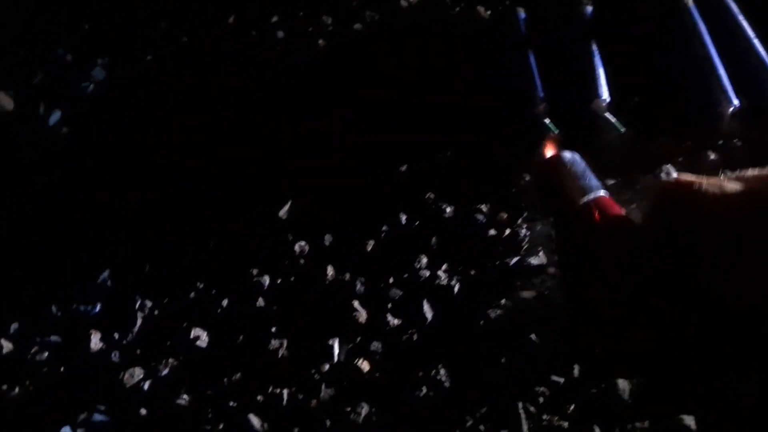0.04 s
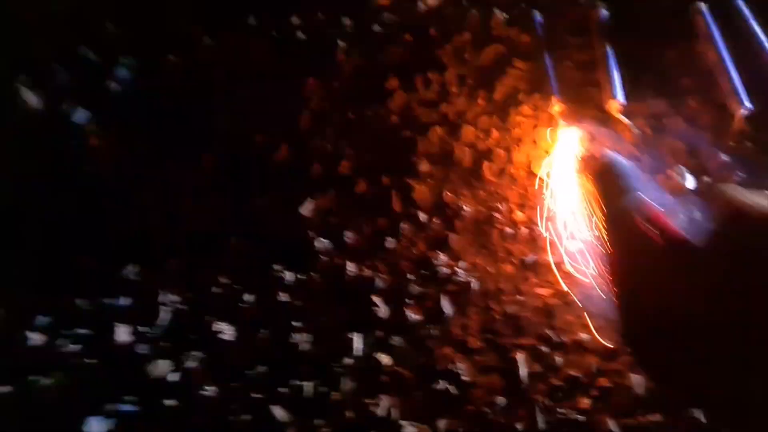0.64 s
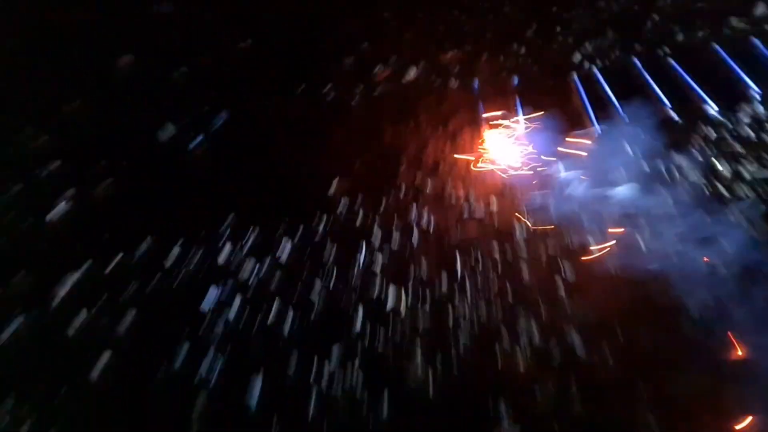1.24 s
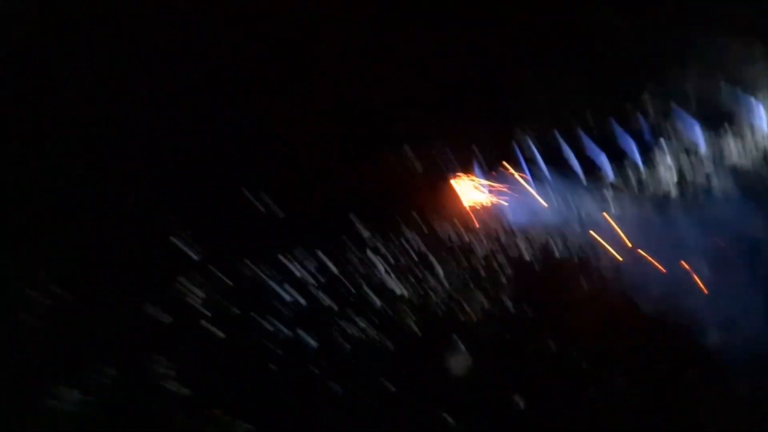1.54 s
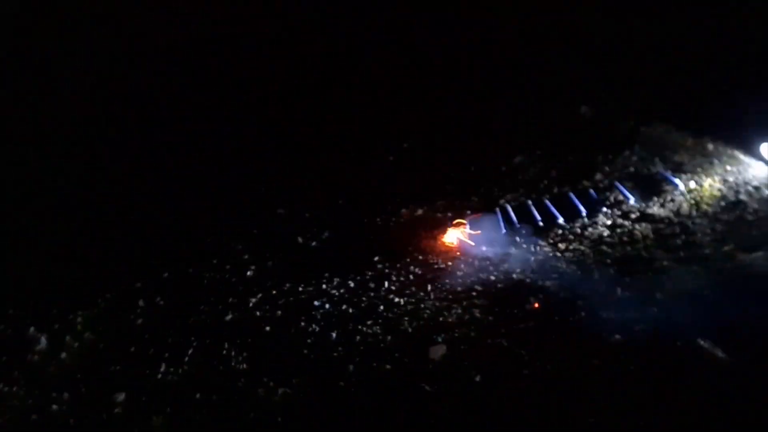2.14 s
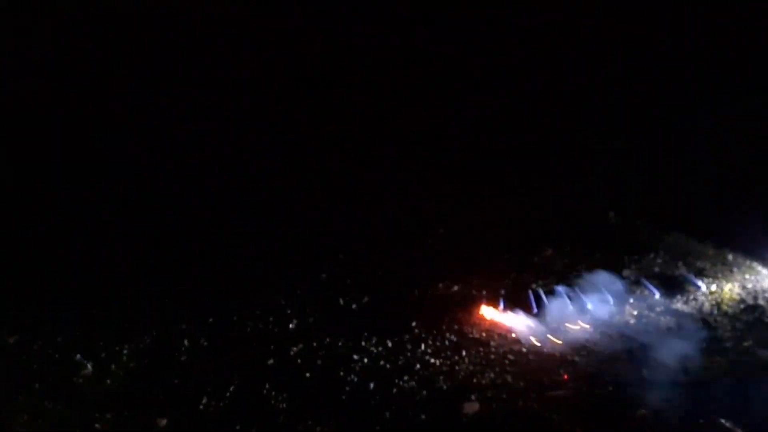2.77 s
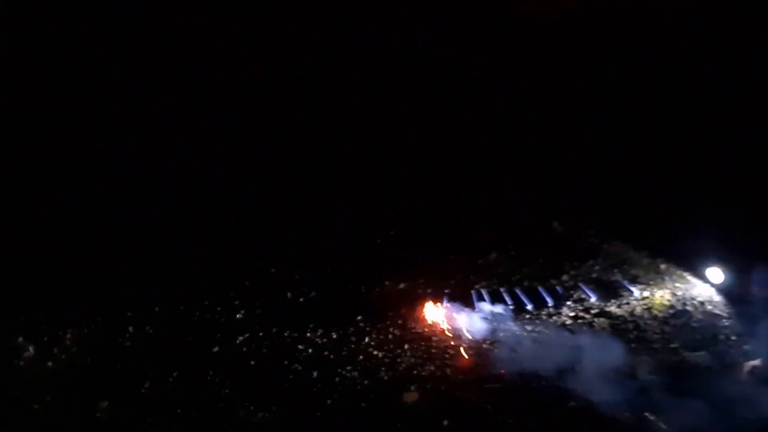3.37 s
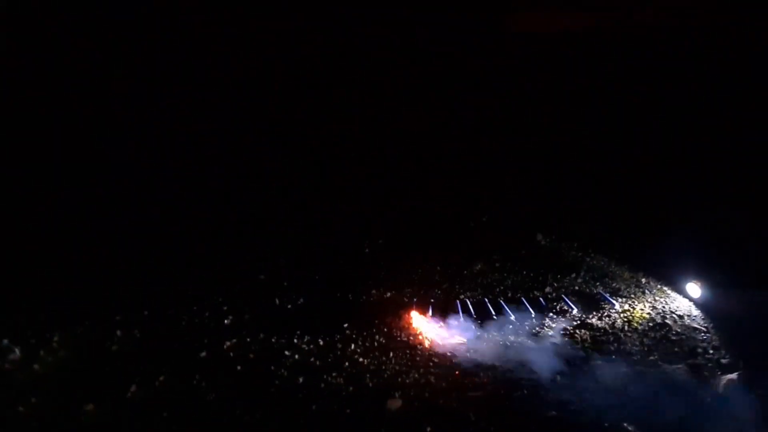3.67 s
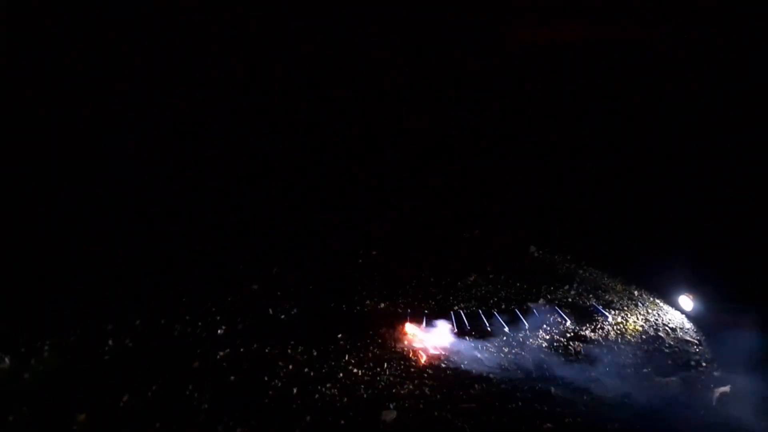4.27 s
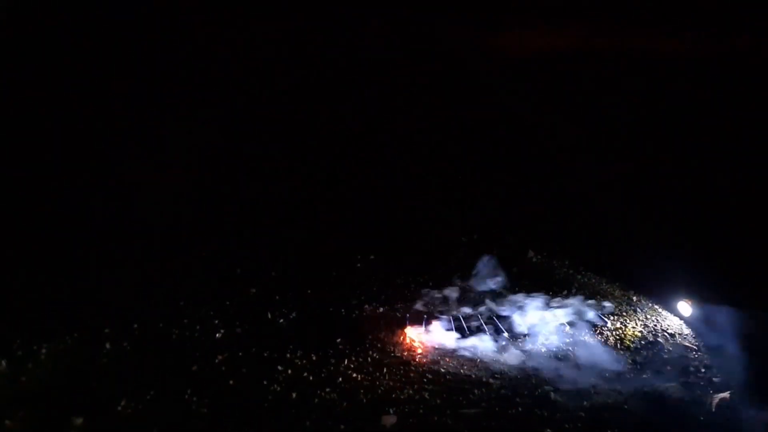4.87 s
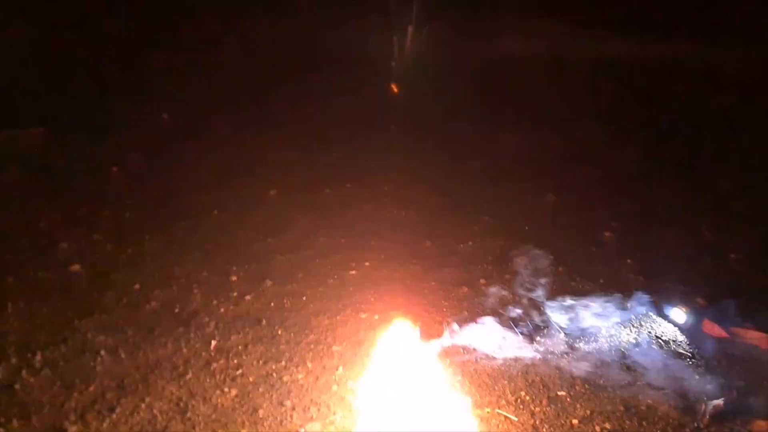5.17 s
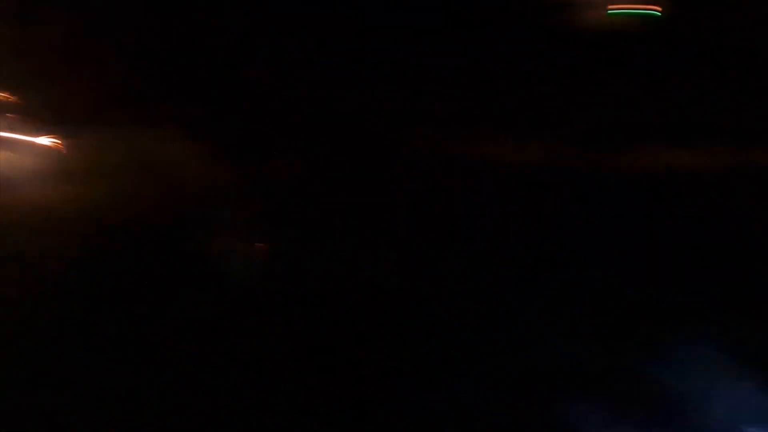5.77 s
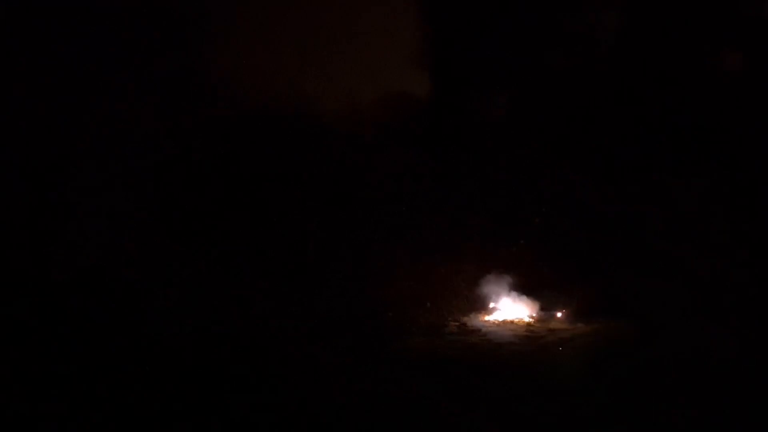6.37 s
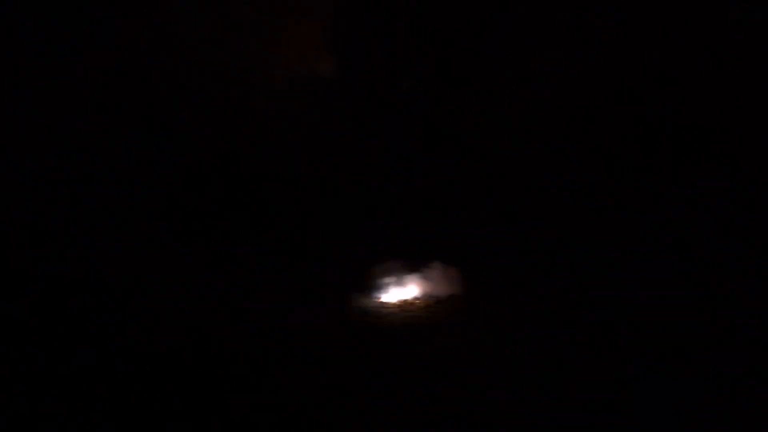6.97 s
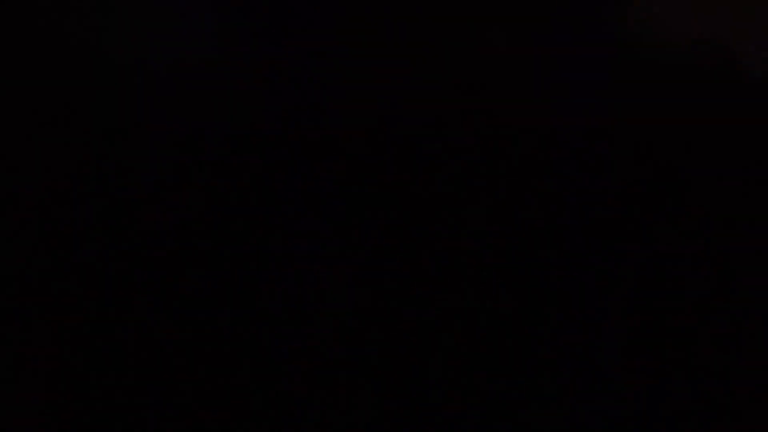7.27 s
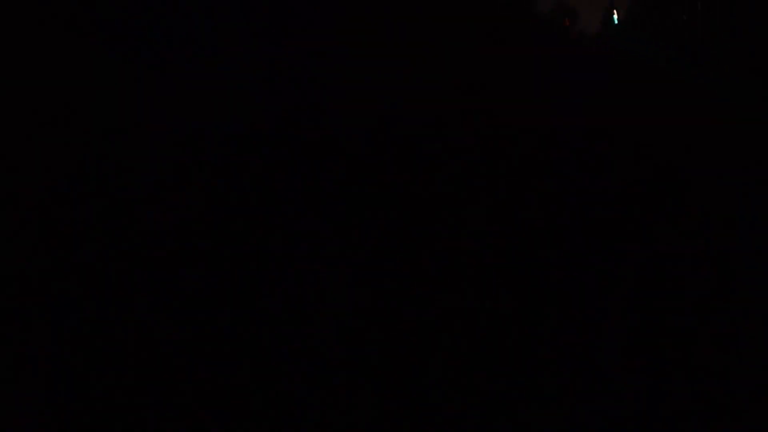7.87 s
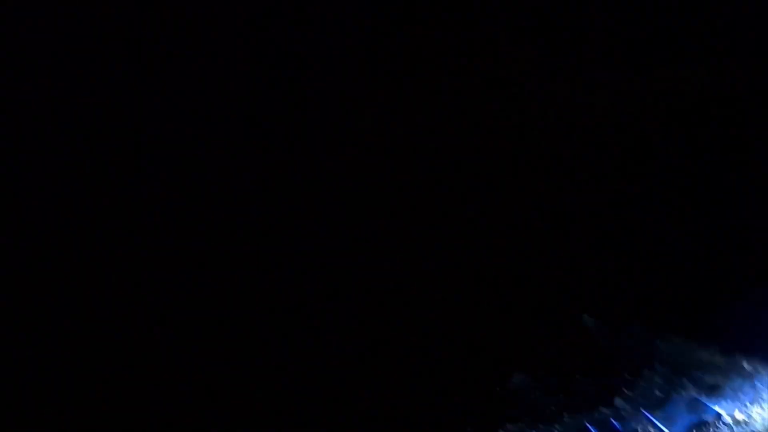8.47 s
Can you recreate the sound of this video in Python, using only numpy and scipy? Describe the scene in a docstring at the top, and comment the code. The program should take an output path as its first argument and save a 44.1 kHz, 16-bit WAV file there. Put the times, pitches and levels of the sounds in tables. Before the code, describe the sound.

A firework fuse hisses and spits, then a loud, shrill whistle falls in pitch, breaks into raspy shrieks and stops, outdoors at night.

```python
"""Howler firework at night

On a gravel path a fuse catches, hisses and spits among a few knocks of feet and hands. The charge
lights and burns in pulses: the tube screams, falls in pitch as it burns hollow and skitters off.
It coughs twice, shrieks, rasps and dies. The surroundings return a short echo over a low, distant drone."""
import sys
import numpy as np
from scipy import signal
from scipy.fft import rfft, irfft, next_fast_len
from scipy.io import wavfile
from scipy.ndimage import uniform_filter1d, minimum_filter1d

SR = 44100
rng = np.random.default_rng(int(sys.argv[2]) if len(sys.argv) > 2 else 0)


def log_audio(samples):
    """Write samples as a 16-bit WAV file to the path given in sys.argv[1]."""
    # one column per channel
    frames = np.atleast_2d(samples).T
    # limit to full scale, then quantise
    limited = np.clip(frames, -1, 1)
    pcm = np.round(limited * 32767).astype(np.int16)
    wavfile.write(sys.argv[1], SR, pcm)


N = 385018
TIME = np.arange(N) / SR

# The long howl sinks as the tube burns hollow. Each row: time in seconds, pitch in Hz.
HOWL_PITCH = [(5.09, 4800), (5.106, 4960), (5.117, 4660), (5.165, 4570), (5.19, 4315), (5.258, 4285),
              (5.286, 4060), (5.41, 3860), (5.45, 3690), (5.5, 3665), (5.62, 3400), (5.71, 3330),
              (5.79, 3160), (5.9, 3325), (6.0, 3149), (6.128, 3155), (6.23, 3000), (6.29, 2975)]
# Its strength. Each row: time in seconds, then fundamental, octave and upper partials in dB.
HOWL_LEVELS = [(5.085, -28, -65, -48), (5.106, -4.5, -27, -23.5), (5.17, -9, -32.5, -28),
               (5.29, -7, -25.5, -18.5), (5.43, -6, -19.5, -23), (5.55, -16.5, -23, -32.5),
               (5.751, -19, -21.5, -37.5), (5.85, -30, -42.5, -49), (5.95, -28, -26, -33),
               (6.1, -21.5, -44, -50), (6.292, -18, -38.5, -45.5)]
# Shrieks after the coughs. Each row: start and length in seconds, first and target pitch in Hz,
# then first level, last level, octave and upper partials in dB.
SHRIEKS = [(6.307, .231, 2715, 2490, -16, -14.5, -36, -39), (6.559, .068, 2146, 2130, -9.5, -14, -34, -28),
           (6.632, .473, 2305, 2175, -20, -16.5, -38, -36), (7.113, .035, 2496, 2477, -30, -42, -66, -57)]
# The scream's bright edge. Each entry: trim in dB, for partials 3 to 7.
UPPER_TRIMS = [-3.5, -5, -7.5, -8.5, -13]
# The tube darts about. Each row: time in seconds, left over right in dB, left ear's lead in radians.
TUBE_DIRECTION = [(5.1, -2.5, 0.9), (5.28, -5, 0.74), (5.39, -8.5, 3.5), (5.45, 3.5, 4.5), (5.52, 2, 5),
                  (5.55, 4, 5), (5.76, 3.5, 5.5), (5.93, 1.5, 4), (6.07, -6.5, -0.5), (6.17, -5.5, -1.53),
                  (6.53, -6.5, -1.45), (6.65, -0.5, -1.4), (7.05, -3.5, 1)]
# In flight the ground reflection falls behind. Each row: time in seconds, extra path in metres.
FLIGHT = [(5.32, .004), (5.353, .0436), (5.393, .134), (5.525, .242), (5.61, .35), (5.78, .485)]
# Tone colours of the gas jet, body and top. Each row: frequency in Hz, relative level in dB.
JET_ROAR = [(80, -20), (900, -3), (1450, 1.5), (1750, 0.5), (2050, 8), (2350, -3.5), (2650, -11),
            (3200, -1), (4200, -21)]
JET_HISS = [(500, -38), (3000, -1.5), (4000, -15), (5500, -0.5), (7800, -3), (9200, -14), (10800, -2.5),
            (12200, 1), (14000, 0.5), (16000, -9.5)]
# Puffs of gas. Each row: start in seconds, peak in dB, centre in Hz, decay in seconds.
COUGHS = [(5.27, -25, 175, 0.045), (6.298, -23, 160, 0.0095), (6.547, -20, 248, 0.014)]
# How fiercely the fuse burns. Each row: time in seconds, level in dB.
FUSE_BURN = [(0, -76), (.4, -62), (.55, -45), (.66, -43), (.97, -41), (1.06, -49), (1.35, -46.5),
             (1.8, -48.5), (2.02, -56), (2.25, -46.5), (2.5, -54), (3.07, -48.5), (3.25, -52.5),
             (3.65, -50), (3.85, -55.5), (4.33, -48.5), (5.03, -53)]
# Tone colours of the fuse, low to high. Each row: frequency in Hz, relative level in dB.
FUSE_FLAME = [(60, -6), (150, 3), (500, 1.5), (1250, 1), (2200, -2), (4000, -8), (8000, -24.5)]
FUSE_HISS = [(1000, -17.5), (3000, -0.5), (5000, -4), (6200, 2), (7300, -6), (9000, -17.5), (12000, -25.5)]
FUSE_FIZZ = [(6000, -31.5), (9000, -41), (10500, -7.5), (12500, -0.5), (15000, 0), (16000, -1)]
# The tube's mouth rings around the flame. Each row: time in seconds, resonance in Hz, level in dB.
TUBE_MOUTH = [(2.3, 2550, -90), (2.7, 2930, -61), (3.05, 3296, -51.5), (3.45, 3610, -46.5),
              (3.9, 3780, -43.5), (4.15, 4128, -43.5), (5.05, 4120, -40.5)]
# Stereo image of fuse and jet. Each row: frequency in Hz, left-right correlation.
FIRE_IMAGE = [(200, 0.94), (4000, 0.7), (9000, .3)]
# Sharp snaps and dull knocks. Each row: start in seconds, peak in dB, centre in Hz, decay in seconds.
SNAPS = [(.622, -23.5, 2200, 0.0025), (1.509, -13.5, 2500, .0007), (1.884, -10.5, 4250, .0026),
         (1.915, -11, 3400, .003), (2.348, -23, 3500, .0011), (2.533, -30.5, 3800, .002),
         (2.641, -29, 3980, .002), (3.075, -28, 6060, .012), (4.34, -28.5, 5490, .03),
         (7.708, -40, 1800, .0015), (8.369, -37, 2010, .0016), (8.695, -40, 1800, .002)]
KNOCKS = [(1.172, -16.5, 290, 0.0027), (1.883, -20.5, 237, .008), (1.912, -26.5, 295, 0.0051),
          (2.177, -21, 197, 0.0048), (2.188, -20, 211, .006), (2.2, -28.5, 198, 0.022),
          (7.93, -41.5, 704, 0.0031), (8.38, -29, 340, 0.013), (8.658, -37, 883, 0.0046)]
# The outdoor tail. Each row: frequency in Hz, seconds to fall 60 dB.
TAIL_DECAY = [(200, .5), (2200, 0.71), (6500, 0.71), (15000, 0.18)]
# Fader rides for the night air and the drone. Each row: time in seconds, level in dB.
AIR_LEVEL = [(0, -47.5), (5.05, -49.5), (5.6, -54.5), (7.25, -58), (8.3, -53.5), (8.42, -50.5),
             (8.73, -51.5)]
DRONE_LEVEL = [(.4, -49), (.7, -41), (3.3, -48), (4.7, -41), (5.6, -47), (8.7, -48)]
# Their tone colours. Each row: frequency in Hz, relative level in dB.
AIR_COLOUR = [(100, 1), (200, -2), (400, -2.5), (700, -1), (1150, 1.5), (2000, 0), (2800, -7.5),
              (4000, -16), (6500, -12.5), (9000, -27), (12500, -20.5), (16000, -25.5)]
DRONE_COLOUR = [(15, -21), (48, -11.5), (59, 1.5), (68, 6), (74, -7), (82, -4), (100, -13.5), (145, -18.5),
                (180, -17), (270, -20), (900, -60)]
# Their stereo image. Each row: frequency in Hz, left-right correlation.
NIGHT_IMAGE = [(60, 0.88), (290, 0.82), (640, .1), (1400, -0.32), (3100, 0.024)]

ATTACK_S, RELEASE_S = 0.014, 0.015  # the tone catches and breaks off
FRESH_START_S, FRESH_LENGTH_S = 5.122, .38  # the fresh charge growls
RASP_START_S = 6.642  # the last of the charge burns raggedly


def scream(hz, tone_db, octave_db, upper_db, rasp_db):
    """The charge burns in pulses at the tube's pitch; uneven burning shakes their size and timing."""
    pan_db, lead = curves(TUBE_DIRECTION)
    ear_phase = lead * np.array([[.5], [-.5]])
    fresh_db = gate_db(FRESH_START_S, FRESH_LENGTH_S, ATTACK_S, release_s=FRESH_LENGTH_S)
    weakness = np.clip((-20 - tone_db) / 10.5, 0, 1)  # below -20 dB the tone turns rough
    rough = .067 + .35 * weakness + .22 * amp(rasp_db) + .039 * amp(fresh_db)
    jitter = .003 * wander(60) + .025 * rough * wander(260)
    phase = 2 * np.pi * np.cumsum(hz * (1 + jitter)) / SR

    def partial(order, db, flutter_db=3.0):
        """The tumbling tube makes a partial flutter differently in each ear."""
        flutter = flutter_db * np.array([wander(35), wander(35)])
        wave = np.cos(order * phase + ear_phase) * (order * hz < SR / 2)
        return np.sqrt(2) * amp(db + flutter) * ground_reflection(order * hz) * wave

    tone = partial(1, tone_db, flutter_db=1.05) + partial(2, octave_db, flutter_db=2.5)
    for order, trim_db in enumerate(UPPER_TRIMS, start=3):
        jet_colour_db = .6 * spectrum_at(JET_HISS, order * hz)
        tone += partial(order, upper_db + trim_db + jet_colour_db, flutter_db=3.2)
    # Strong and weak cycles alternate, adding a growl of half-order partials; the lowest fades first.
    growl_db = fresh_db - 12 - 30 * ((TIME - FRESH_START_S) / FRESH_LENGTH_S) ** 2
    tone += partial(1 / 2, tone_db + 3 * growl_db + 21)
    tone += partial(3 / 2, tone_db + growl_db - 3)
    tone += partial(5 / 2, tone_db + growl_db - 14)
    squeal_db = rasp_db - 26 - 29 * np.maximum(TIME - RASP_START_S, 0)  # rides on the rasp, fading
    tone += partial(7 / 2, squeal_db)
    shake = np.maximum(1 + .85 * rough * wander(280), 0) / np.sqrt(1 + rough ** 2 / 2)
    breath = resonate(rng.standard_normal((2, N)), hz, width_hz=300) * amp(tone_db - 28)
    return (tone * shake + breath) * panned(pan_db)


def charge_burn():
    """Pitch and levels of the burning charge: one long howl, then short shrieks that each sag."""
    hz, = curves(HOWL_PITCH)
    howl_start, howl_end = HOWL_LEVELS[0][0], HOWL_LEVELS[-1][0]
    levels_db = curves(HOWL_LEVELS) + gate_db(howl_start, howl_end - howl_start, ATTACK_S, RELEASE_S)
    for start, length, first_hz, target_hz, first_db, last_db, octave_db, upper_db in SHRIEKS:
        progress = np.clip((TIME - start) / length, 0, 1)
        sagging_hz = target_hz + (first_hz - target_hz) * np.exp(-progress / .33)
        hz = np.where(TIME > start - ATTACK_S / 2, sagging_hz, hz)
        tone_db = first_db + (last_db - first_db) * progress
        envelope_db = gate_db(start, length, ATTACK_S, RELEASE_S)
        levels_db = np.maximum(levels_db, [envelope_db + db for db in (tone_db, octave_db, upper_db)])
    return hz, *levels_db


def ground_reflection(hz):
    """Comb-filter gain in flight: the bounce off the ground cancels and supports a partial in turn."""
    strength = .63 * during(FLIGHT)
    delay_s = curves(FLIGHT)[0] / 343
    return abs(1 + strength * np.exp(2j * np.pi * hz * delay_s)) / (1 + strength)


def gas_jet(tone_db, upper_db, rasp_db):
    """Gas leaves in ragged spurts: a spit at ignition, a rush under the tone, a surge in the rasp."""
    spurts = amp(1.9 * wander(300))
    roar = noise(JET_ROAR, FIRE_IMAGE, band_hz=(300, 1800), drive=spurts)
    hiss = noise(JET_HISS, FIRE_IMAGE, band_hz=(5200, 15800), drive=spurts)
    roar_db = tone_db - 31.5 - 13 * during(FLIGHT, fade_s=.055)
    hiss_db = upper_db - 7.5 - 2 * during(FLIGHT, fade_s=.1)
    roar *= np.hypot(amp(roar_db), amp(rasp_db - 31.5))
    hiss *= np.hypot(amp(hiss_db), amp(rasp_db - 30.5))
    spit = resonate(rng.standard_normal((2, N)) * spurts, hz=np.full(N, 5300), width_hz=2300)
    spit *= amp(-24 + gate_db(start_s=5.075, hold_s=.04, attack_s=.068, release_s=.25))
    return roar * panned(-2) + (hiss + spit) * panned(-6.5)


def coughs():
    """The charge coughs out low puffs of gas, one during the howl and two after it."""
    return bursts(COUGHS, bandwidth=2.8, spread=.3, pan_db=-3.5)


def fuse():
    """Powder grains flare one after another; the flame sinks into the tube, muffled, and rings it."""
    burn_db, = curves(FUSE_BURN)
    inside = np.clip((TIME - 1.7) / 1.3, 0, 1)  # reaches the tube at 1.7 s, sinks in over 1.3 s
    sparks = (rng.random(N) < 160 / SR) * np.minimum(rng.exponential(1, N), 4)
    sputter = amp(wander(26) + 1.5 * wander(400)) * (1 + 2.7 * sparks)
    flame = noise(FUSE_FLAME, FIRE_IMAGE, drive=sputter) * amp(burn_db + 3 - 7.6 * inside)
    hiss = noise(FUSE_HISS, FIRE_IMAGE, drive=sputter)
    hiss *= amp(burn_db + 2.5 - 1.5 * inside + .8 * wander(17))
    flare_db = .22 * (burn_db + 48.5)  # a fiercer burn is brighter
    fizz = noise(FUSE_FIZZ, FIRE_IMAGE, drive=sputter)
    fizz *= amp(burn_db + flare_db - 3 + 1.6 * inside + 1.7 * wander(7))
    fire = flame * panned(-1.2) + hiss * panned(-5) + fizz * panned(-6.5)
    return (fire + tube_mouth(sputter) * panned(-9)) * during(FUSE_BURN, fade_s=.13)


def tube_mouth(sputter):
    """The fuse's gas sounds two odd modes of the mouth; the upper one needs a stronger flow."""
    hz, level_db = curves(TUBE_MOUTH)
    flow = (rng.standard_normal(N) + .37 * rng.standard_normal((2, N))) * sputter
    lower = resonate(flow, hz, width_hz=700)
    upper = resonate(flow, 2.9 * hz, width_hz=1500) * amp(-8 + (level_db - level_db.max()) / 3)
    return (lower + upper) * amp(level_db)


def snaps():
    """Fuse and grit crack sharply, off to the right."""
    return bursts(SNAPS, bandwidth=1.5, spread=.89, pan_db=-12.5)


def knocks():
    """Feet and hands land dully, with a hint of ring."""
    return bursts(KNOCKS, bandwidth=1.74, spread=.17, pan_db=-2.5, ring=.16)


def outdoor_echo(dry, near_db, echo_db, echo_s, smear_s):
    """Ground and trees return a thin scatter, then a dark, smeared echo."""
    t = np.arange(SR) / SR
    taps = rng.standard_normal((2, SR)) * (rng.random((2, SR)) < 2000 / SR) * (t > .004)
    hz, age, scatter = signal.stft(taps, SR, nperseg=256)
    tail = amp(-60 * age / spectrum_at(TAIL_DECAY, hz)[:, None])
    near = amp(near_db) * np.exp(-age / .025)
    echo = amp(echo_db - hz[:, None] / 700) * np.exp(-((age - echo_s) / smear_s) ** 2)
    response = signal.istft(scatter * (tail + near + echo), SR, nperseg=256)[1]
    return signal.fftconvolve(dry, response / np.linalg.norm(response[0]), axes=1)[:, :N]


def night():
    """A bed of faint air and a low drone from far away."""
    air = noise(AIR_COLOUR, NIGHT_IMAGE) * amp(curves(AIR_LEVEL)[0] + .71 * wander(8))
    drone = noise(DRONE_COLOUR, NIGHT_IMAGE) * amp(curves(DRONE_LEVEL)[0])
    return air * panned(-1.5) + drone * panned(-3.5)


def bursts(rows, bandwidth, spread, pan_db, ring=0):
    """Decaying puffs of band-passed noise with optional ring; bandwidth is relative to the centre."""
    mix, t = np.zeros((2, N)), np.arange(8192) / SR
    hz = np.fft.rfftfreq(len(t), 1 / SR)
    treble_cut = 1 / (1 + (hz / 7500) ** 6) + .074
    for start, peak_db, centre_hz, decay_s in rows:
        middle, *sides = rng.standard_normal((3, len(t)))
        ringing = ring * np.sin(2 * np.pi * centre_hz * t)
        puff = (middle + spread * np.array(sides) + ringing) * np.exp(-t / decay_s)
        ratio = 1j * hz / centre_hz
        band = bandwidth * ratio / (1 + bandwidth * ratio + ratio ** 2)
        puff = irfft(rfft(puff) * treble_cut * band ** 2)
        puff *= amp(peak_db) / abs(puff.mean(0)).max()
        slot = mix[:, round(start * SR):][:, :len(t)]
        slot += puff[:, :slot.shape[1]]
    return mix * panned(pan_db)


def noise(colour, image, band_hz=(20, 16000), drive=1):
    """Coloured stereo noise, rms 1 within the band; drive makes it sputter."""
    size = next_fast_len(N)
    hz = np.fft.rfftfreq(size, 1 / SR)
    left, other = rfft(rng.standard_normal((2, N)) * drive, size)
    likeness = np.clip(spectrum_at(image, hz), -1, 1)
    right = likeness * left + np.sqrt(1 - likeness ** 2) * other
    gain = amp(spectrum_at(colour, hz))
    band_share = np.sum(gain[(hz > band_hz[0]) & (hz < band_hz[1])] ** 2) / np.sum(gain ** 2)
    return unit(irfft(np.array([left, right]) * gain, size)[:, :N]) / np.sqrt(band_share)


def wander(rate_hz):
    """Smooth random modulation up to a rate, rms 1."""
    size = next_fast_len(N)
    hz = np.fft.rfftfreq(size, 1 / SR)
    return unit(irfft(rfft(rng.standard_normal(size)) / (1 + (hz / rate_hz) ** 4), size)[:N])


def resonate(x, hz, width_hz):
    """A swept two-pole resonance, rms 1."""
    carrier = np.exp(2j * np.pi * np.cumsum(hz) / SR)
    pole = np.exp(-np.pi * width_hz / SR)
    return unit((carrier * signal.lfilter([1], [1, -2 * pole, pole * pole], x / carrier)).real)


def gate_db(start_s, hold_s, attack_s, release_s):
    """An envelope in dB, fully open at the start time; attack and release each span 60 dB."""
    early, late = np.maximum(start_s - TIME, 0), np.maximum(TIME - start_s - hold_s, 0)
    return np.maximum(-60 * (early / attack_s + late / release_s), -200)


def during(rows, fade_s=.014):
    """1 while a table lasts, with short fades outside it."""
    return np.clip(np.minimum(TIME - rows[0][0], rows[-1][0] - TIME) / fade_s + 1, 0, 1)


def curves(rows):
    """A table's columns as automation curves."""
    times, *columns = np.transpose(rows)
    return [np.interp(TIME, times, column) for column in columns]


def spectrum_at(points, hz):
    """Reads a table on a log-frequency axis."""
    point_hz, values = np.transpose(points)
    return np.interp(np.log(hz + 1), np.log(point_hz + 1), values)


def panned(db):
    """Left and right gains of mean power 1; negative dB leans right."""
    ratio = np.atleast_1d(amp(db))
    return np.array([ratio, np.ones_like(ratio)]) / np.sqrt((1 + ratio ** 2) / 2)


def amp(db):
    return 10 ** (np.asarray(db) / 20)


def unit(x):
    """Scales to rms 1."""
    return x / np.sqrt(np.mean(abs(x) ** 2) + 1e-20)


def scene():
    """The firework, snaps and knocks with their outdoor echo, over the night bed."""
    hz, tone_db, octave_db, upper_db = charge_burn()
    rasp_db = gate_db(RASP_START_S, hold_s=.28, attack_s=.08, release_s=.34)
    direct = fuse() + scream(hz, tone_db, octave_db, upper_db, rasp_db)
    direct += gas_jet(tone_db, upper_db, rasp_db) + coughs() + snaps() + knocks()
    echo = outdoor_echo(direct, near_db=18, echo_db=-23.5, echo_s=.4, smear_s=.14)
    return direct + amp(-11.5) * echo + night()


def record(dry):
    """A fast limiter holds down the loudest cycles; a steep low-pass trims the very top."""
    needed_gain = 1 / np.maximum(abs(dry).max(0) / .97, 1)
    limited = dry * uniform_filter1d(minimum_filter1d(needed_gain, size=256), size=256)
    low_pass = signal.firwin(511, cutoff=15900, window=("kaiser", 9), fs=SR)
    return signal.oaconvolve(limited, low_pass[None], "same")


dry = scene()
out = record(dry)
log_audio(out)
```